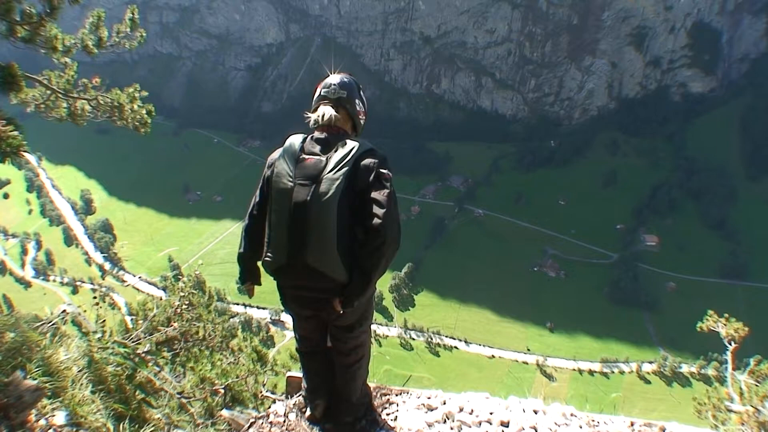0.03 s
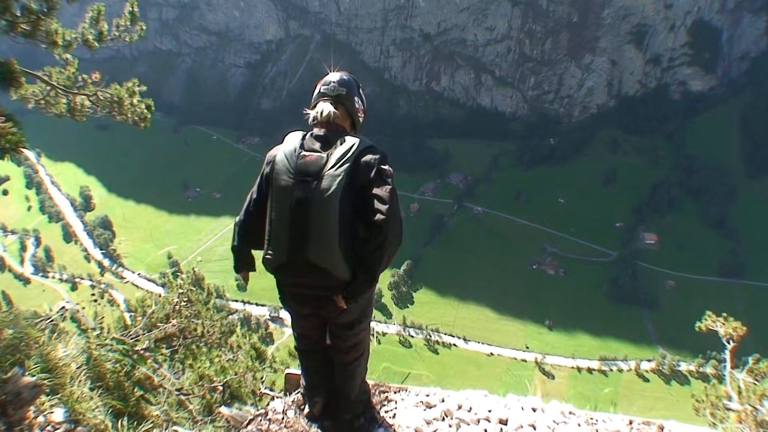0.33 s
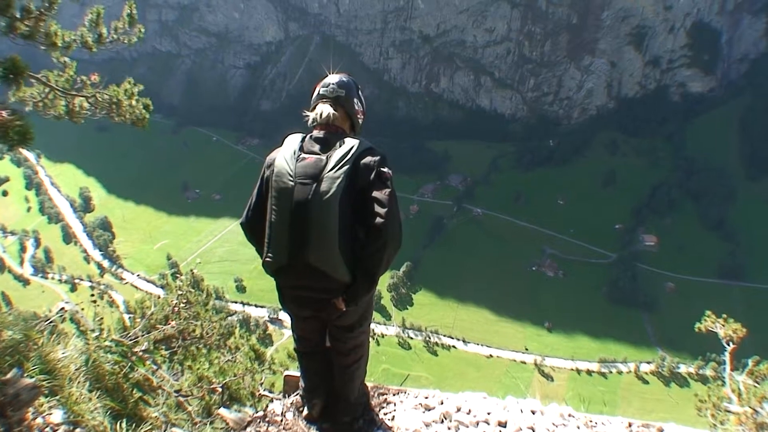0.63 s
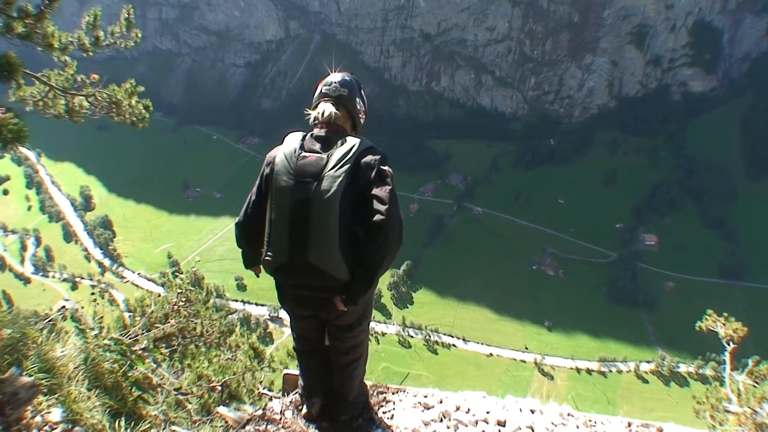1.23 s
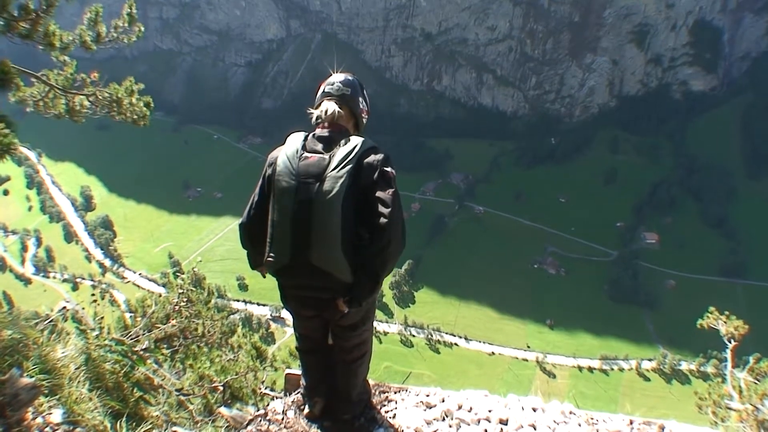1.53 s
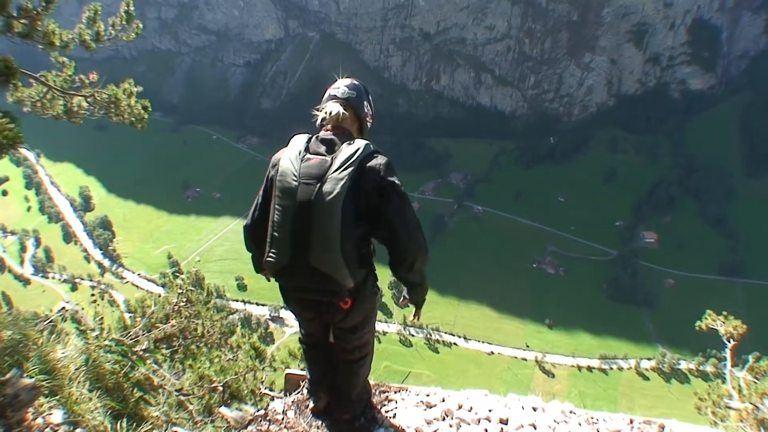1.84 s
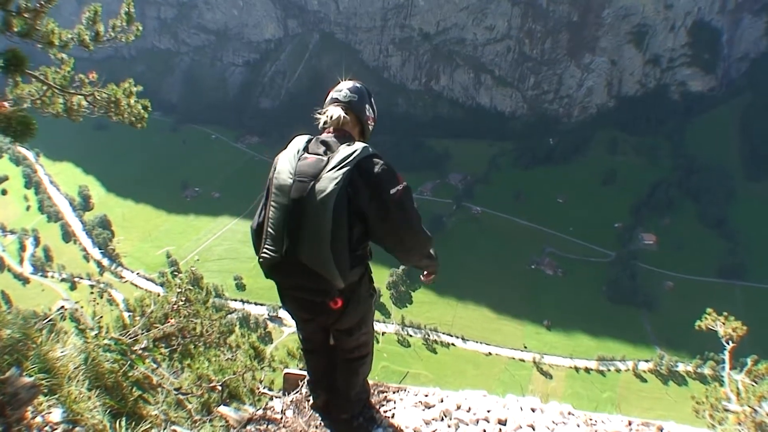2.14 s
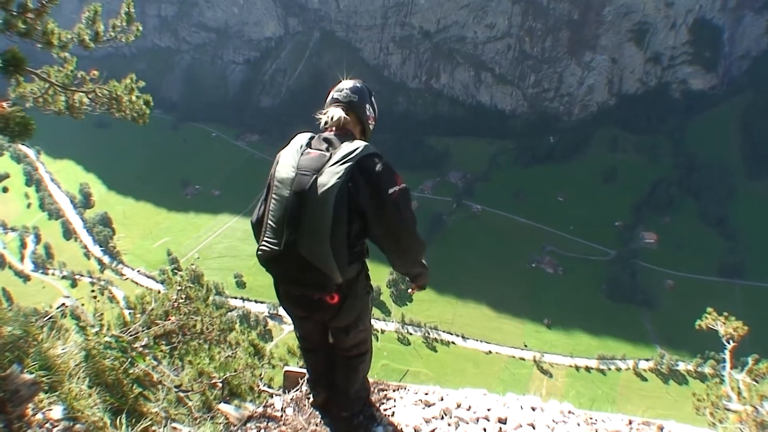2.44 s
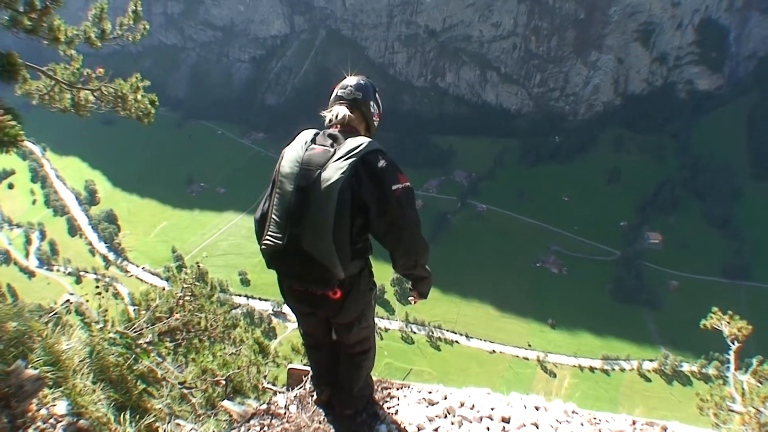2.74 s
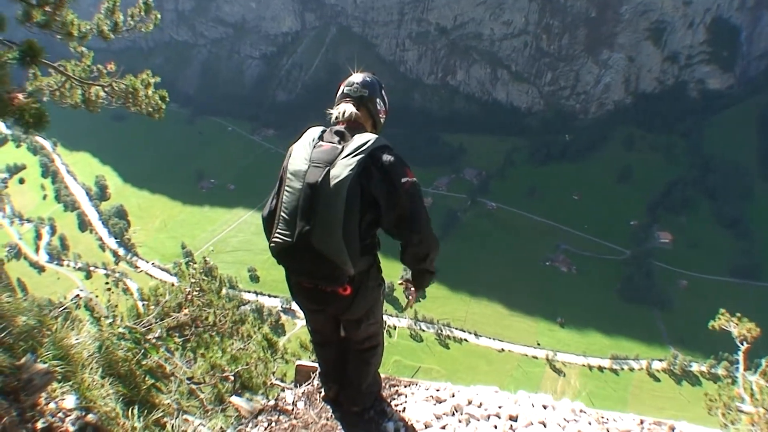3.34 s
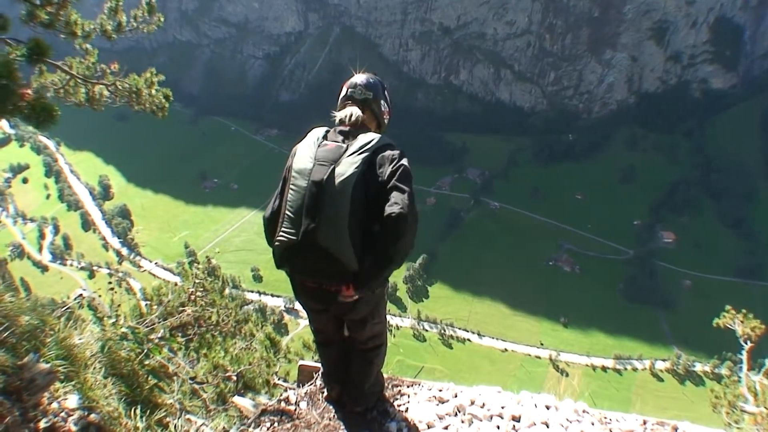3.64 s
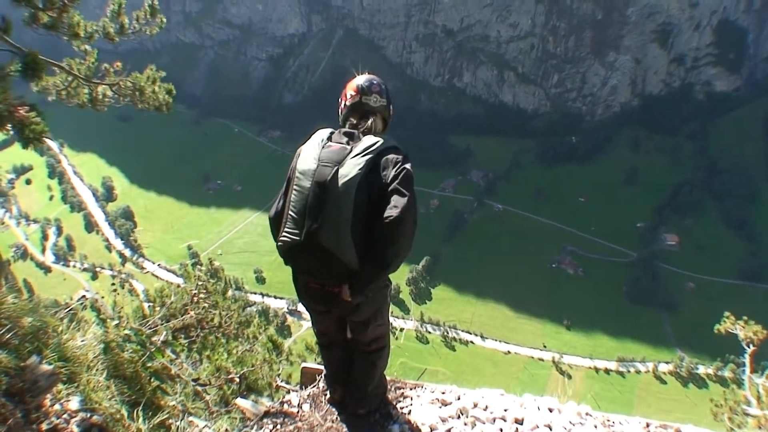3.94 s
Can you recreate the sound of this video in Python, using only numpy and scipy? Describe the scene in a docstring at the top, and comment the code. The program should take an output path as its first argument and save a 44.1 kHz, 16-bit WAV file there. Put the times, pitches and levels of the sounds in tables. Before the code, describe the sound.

A broad, steady roar of wind and distant rushing water rises from a valley to a cliff edge for the whole four seconds, churning slightly. A light breeze adds a low rumble on the microphone, with one soft gust at about 1.6 seconds. Close by and much quieter, the camera's tape motor hums throughout, with a thin, wavering high whine and a faint whir over light hiss.

```python
"""A steady roar of wind and far rushing water rises from a deep valley, heard from a cliff edge.
A light breeze buffets the microphone, with one soft gust near the middle; both are shaped noise.
Close by, the camera's tape drive hums and whines in wavering tones, while its spinning parts
scrape hundreds of times a second and whir faintly over a thin hiss."""
import sys
import numpy as np
from scipy import signal
from scipy.fft import rfft, irfft
from scipy.io import wavfile

SR = 44100
rng = np.random.default_rng(int(sys.argv[2]) if len(sys.argv) > 2 else 0)


def master_out(mix):
    """Clip the mix to full scale and print it as 16-bit PCM to the path in sys.argv[1]."""
    frames = np.transpose(np.atleast_2d(mix))
    ceiling = np.clip(frames, -1, 1)
    pcm = np.round(ceiling * 32767).astype(np.int16)
    wavfile.write(sys.argv[1], SR, pcm)


N = 176400
TIME, FREQS = np.arange(N) / SR, np.maximum(np.arange(N // 2 + 1) * SR / N, 1)


# Tone colour of the roar: f/Hz, relative level/dB
ROAR_EQ = [(53, -37), (90, -8), (128, -8.5), (199, -2.5), (291, 1), (363, -0.5), (439, -6.5), (479, -4),
           (531, -5.5), (580, -8), (633, -8.5), (712, -14), (1160, -8), (1600, -16), (1740, -13),
           (2020, -24), (2240, -25.5), (2410, -29), (3000, -33), (3900, -66), (6600, -120)]
# Its stereo image: f/Hz, left minus right/dB, correlation
ROAR_IMAGE = [(110, -0.5, 0.8), (230, -0.5, 0.96), (400, 2.6, 1), (790, 3, 0.95), (1260, 3.8, 0.99),
              (1860, 7.5, 0.36), (2640, -2, 0.37)]
# Its fader rides, before trim: t/s, body/dB, middle/dB, rush/dB
ROAR_FADERS = [(.1, -39.5, -40.5, -41), (.22, -38.5, -41, -41.5), (.31, -37, -38, -41),
               (.39, -40.5, -41, -42), (.46, -37, -39.5, -41), (.67, -40, -40, -42.5),
               (.8, -40, -41.5, -42), (1.15, -39, -37.5, -41.5), (1.45, -40, -39, -41.5),
               (1.6, -39, -38.5, -41.5), (1.82, -41, -39.5, -40.5), (2.05, -40, -37, -42),
               (2.17, -36.5, -40.5, -41.5), (2.27, -41, -42, -41.5), (2.36, -36.5, -35, -44),
               (2.44, -38.5, -40.5, -42.5), (2.58, -37, -40.5, -42), (2.8, -39, -39.5, -42),
               (3.07, -40.5, -40, -41.5), (3.17, -37, -40, -41.5), (3.24, -40.5, -41, -43),
               (3.42, -39, -39, -41.5), (3.6, -40, -39.7, -41), (4, -38.5, -40, -41.3)]
def valley_roar(patchy_db=0.71, patch_hz=5, churn_db=.3, churn_hz=9.4):
    """Wind and far water merge into broad noise: low body, middle and upper rush, all churning a little."""
    low_cut_hz, rush_from_hz, high_cut_hz = 95, 708, 3050
    trims_db = 0.77, -0.64, 0.55
    noise = colour(rng.standard_normal((2, N)), ROAR_EQ)
    spectrum = rfft(mic_ports(place(noise, ROAR_IMAGE)))
    spectrum /= np.sqrt((1 + (FREQS / high_cut_hz) ** 12) * (1 + (low_cut_hz / FREQS) ** 8))
    edges = rush_from_hz * 2 ** np.arange(-4, 3.1, .5)   # half-octave bands
    bands = []
    for low, high in zip(edges, edges[1:]):
        band = irfft(spectrum * ((FREQS >= low) & (FREQS < high)), N)
        bands.append(band * from_db(patchy_db * drift(patch_hz)))
    body, middle, rush = sum(bands[:6]), sum(bands[6:8]), sum(bands[8:])
    roar = sum(from_db(fader_db + trim_db) * rms_one(layer)
               for layer, fader_db, trim_db in zip((body, middle, rush), in_time(ROAR_FADERS), trims_db))
    return roar * from_db(churn_db * drift(churn_hz))


# Fader ride of the breeze, before trim: t/s, level/dB
BREEZE_FADER = [(.1, -51), (.7, -47), (.85, -48.5), (1.2, -48), (1.33, -45.5), (1.46, -48.5), (1.62, -44),
                (1.8, -48.5), (1.95, -46.5), (2.1, -44.5), (2.22, -52), (2.42, -48), (2.6, -51.5),
                (2.92, -52), (3.05, -48), (3.5, -47.5), (4, -48.5)]
# Tone colours of the breeze and the gust: f/Hz, relative level/dB
BREEZE_EQ = [(12, -5), (22, 17), (30, 11.5), (42, 15.5), (58, 18), (78, 14), (98, 2), (135, 5), (190, -29),
             (1500, -90)]
GUST_EQ = [(40, -13), (75, 12), (130, 12.5), (170, -10), (260, 8), (340, -20), (1500, -90)]
def breeze(trim_db=1, pan_db=-4, gust_s=1.64, gust_width_s=0.075, gust_db=-35):
    """Air buffets the microphone: a soft low rumble that reaches higher in the gust."""
    rumble = from_db(in_time(BREEZE_FADER)[0] + trim_db) * colour(rng.standard_normal(N), BREEZE_EQ)
    swell = from_db(gust_db) * np.exp(-((TIME - gust_s) / gust_width_s) ** 2)
    gust = swell * colour(rng.standard_normal(N), GUST_EQ)
    return pan(pan_db) * mic_ports(rumble + gust)


# Partials of the hum, before the swell: f/Hz, level/dB, left minus right/dB
HUM_PARTIALS = [(119.9, -51.3, -2), (149.9, -51.3, -1), (179.8, -51.5, -1), (477, -50.5, 2),
                (571.8, -47.3, 3), (599.4, -55.5, 3), (899.1, -57.5, 3), (1143.5, -58.5, 4), (1733, -64, 6),
                (1798.2, -62.5, 9), (2190.3, -67.5, 4)]
# The hum swells and eases: t/s, gain/dB
HUM_FADER = [(.1, 1.2), (1.1, -0.3), (1.7, 1.3), (2.3, 0.7), (2.7, -1), (4, -0.4)]
def drive_hum():
    """The tape drive's motor hums in nearly steady partials, each with its own pan."""
    hum = sum(pan(pan_db) * from_db(db) * motor_tone(hz, waver_hz=0.66, flutter_db=1.0)
              for hz, db, pan_db in HUM_PARTIALS)
    return from_db(in_time(HUM_FADER)[0]) * hum


# Partials of the whine: f/Hz, starting level/dB, slope/(dB per s)
WHINE_PARTIALS = [(2648, -75.5, 1), (3295.5, -77, 0), (3564, -81.5, -.3), (3596, -80, -.3),
                  (3898, -79.5, -.3), (4194, -80, -.3), (4495, -77, -.3), (4570, -82, -.3),
                  (4796, -74.2, -.6), (4883, -79.5, -1), (4931, -75, -.9), (5093, -79, -.5),
                  (5394, -82, -.3), (5486, -81, -.3), (5696, -82, -.3), (6293, -85, 0), (6858, -81.5, 0),
                  (6955, -83, 0), (7084, -85, 0), (7311, -81.5, 0), (7772, -80, 0), (8290, -84.5, 0),
                  (8737, -83.5, 0), (9717, -85.5, 0), (10002, -79.5, -.8), (11989, -88, 0), (12290, -90, 0)]
def drive_whine(pan_db=-7):
    """Thin, high tones of the tape drive flutter on the right."""
    whine = sum(from_db(db + slope * TIME) * motor_tone(hz, waver_hz=1.17, flutter_db=3.0)
                for hz, db, slope in WHINE_PARTIALS)
    return pan(pan_db) * whine


# Tone colours of the head drum, capstan and casing: f/Hz, relative level/dB
DRUM_EQ = [(1500, -8), (2600, -5), (3600, 8.5), (4200, -3), (4900, 4), (5800, -8.5), (7500, 4), (9000, -14),
           (10000, -9), (10900, -15), (12300, -21), (15000, -19)]
CAPSTAN_EQ = [(2500, -5), (4900, -6.5), (5800, 2.5), (7000, 1), (7800, 0), (8700, -0.5), (9300, -8),
              (10100, 0.5), (10800, -20), (15000, -20)]
CASING_EQ = [(7000, -14), (8200, -1), (8700, 1.5), (9300, -4), (9700, -7), (10050, 1), (10400, -6),
             (10900, -10), (12000, -6), (13000, -8), (15000, -22)]
def drive_whir(drum_hz=299.7, capstan_hz=457.1, fade_db_per_s=0.1):
    """The head drum ticks, the capstan whirs and the casing sizzles at the drum's rate."""
    drum_db = -63 - fade_db_per_s * (TIME - TIME.mean())
    drum = from_db(drum_db) * rotor(drum_hz, DRUM_EQ, decay_s=0.001, loose=0.23, count=10)
    capstan = from_db(-65.5) * rotor(capstan_hz, CAPSTAN_EQ, decay_s=0.0024, loose=0.19, count=10)
    casing = from_db(-71) * rotor(drum_hz, CASING_EQ, decay_s=0.0035, loose=0.54, count=7)
    return drum + capstan + casing


# Stereo image of the spinning parts: f/Hz, left minus right/dB, correlation
ROTOR_IMAGE = [(2600, 8, -0.34), (3740, -10, -0.3), (4900, -3, -0.26), (8000, -7, -0.34), (8450, -.5, 0.53),
               (11000, -0.5, 1)]
def rotor(hz, eq, decay_s, loose, count):
    """Short, even scrapes: the roughness loops every `count` contacts, with `loose` fresh noise added."""
    period = count * SR / hz
    orders = np.arange(1, int(period / 2))
    bins = np.round(orders * N / period).astype(int)
    harmonics = np.zeros((2, N // 2 + 1), complex)
    harmonics[:, bins] = np.exp(2j * np.pi * rng.random((2, len(orders))))
    roughness = rms_one(irfft(harmonics, N)) + loose * rng.standard_normal((2, N))
    contact = np.exp(-(TIME % (1 / hz)) / decay_s)
    return place(colour(contact * roughness, eq), ROTOR_IMAGE)


# Tone colour of the hiss: f/Hz, relative level/dB
HISS_EQ = [(2000, -4), (3000, 5.5), (4200, 5.5), (6000, -0.5), (10000, -3), (11000, -6.3), (13000, -7),
           (15200, -10)]
# Its stereo image: f/Hz, left minus right/dB, correlation
HISS_IMAGE = [(3000, -2, 0.14), (7800, -3, 0.2), (9000, 0, 0.83), (11000, 0.5, .99)]
def mic_hiss(level_db=-63.5):
    """The microphone's own noise lays a thin, steady bed under everything."""
    return from_db(level_db) * place(colour(rng.standard_normal((2, N)), HISS_EQ), HISS_IMAGE)


# Phase between the microphone ports: f/Hz, left lead/rad
PORT_LEAD = [(120, 0.46), (400, 0.34), (850, -0.25), (1400, -0.3), (2000, -1.7), (2800, -2.1)]
def mic_ports(x):
    """Sound meets the two microphone ports out of step."""
    lead = at_hz(PORT_LEAD, FREQS)[0]
    return irfft(rfft(x) * np.exp(.5j * lead * np.array([[1], [-1]])), N)


def motor_tone(hz, waver_hz, flutter_db):
    """A sine that wavers in pitch and level; unit power."""
    turns = np.cumsum(hz + waver_hz * drift(5.4)) / SR + rng.random()
    return rms_one(np.sin(2 * np.pi * turns) * from_db(flutter_db * drift(10.0)))


def drift(rate_hz):
    """Slow random wander with spread 1."""
    hop, settle = 40, 2000
    pole = np.exp(-2 * np.pi * rate_hz * hop / SR)
    noise = rng.standard_normal(N // hop + settle + 2)
    slow = signal.lfilter([1], [1, -2 * pole, pole * pole], noise)[settle:]
    return np.interp(np.arange(N) / hop, np.arange(len(slow)), rms_one(slow))


def colour(x, eq):
    """Shape a sound with an EQ curve; unit power."""
    return rms_one(irfft(rfft(x) * from_db(at_hz(eq, FREQS)[0]), N))


def place(pair, image):
    """Mix two unrelated sounds as mid and side into a stereo image; unit power."""
    balance_db, correlation = at_hz(image, FREQS)
    correlation = np.clip(correlation, -1, 1)
    mid, side = rfft(pair)
    stereo = np.sqrt(1 + correlation) * mid + np.sqrt(1 - correlation) * side * [[1], [-1]]
    return rms_one(irfft(pan(balance_db) * stereo, N))


def pan(db):
    """Constant-power gains for a left minus right level."""
    gains = from_db(np.array([[.5], [-.5]]) * db)
    return gains / np.sqrt(np.mean(gains ** 2, axis=0))


def in_time(rows):
    """Each column of a fader ride at every sample."""
    times, *columns = np.transpose(rows)
    return [np.interp(TIME, times, column) for column in columns]


def at_hz(rows, hz):
    """Each column of a table at the given frequencies."""
    freqs, *columns = np.transpose(rows)
    return [np.interp(np.log(hz), np.log(freqs), column) for column in columns]


def from_db(db):
    """Decibels to gain."""
    return 10 ** (np.asarray(db) / 20)


def rms_one(x):
    """Scale to unit power."""
    return x / np.sqrt(np.mean(x ** 2) + 1e-20)


def scene():
    """Roar in front, then breeze and tape drive, over a bed of hiss."""
    bed = mic_hiss()
    return valley_roar() + breeze() + drive_hum() + drive_whine() + drive_whir() + bed


def record(dry):
    """The sound cuts in, and a steep low-pass takes off the very top."""
    start_s, fade_s, cutoff_hz = .076, .002, 15500
    opening = np.clip((TIME - start_s) / fade_s, 0, 1)
    low_pass = signal.cheby2(24, 60, cutoff_hz, fs=SR, output="sos")
    return signal.sosfilt(low_pass, dry * opening + 1e-18)


dry = scene()
out = record(dry)
master_out(out)
```